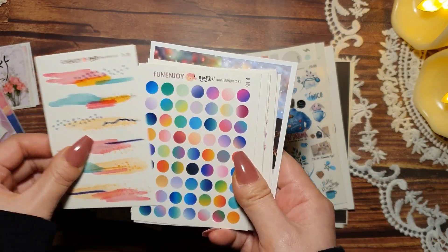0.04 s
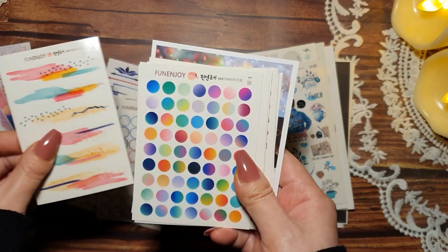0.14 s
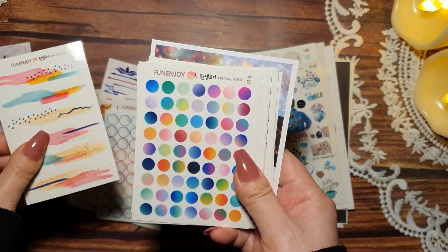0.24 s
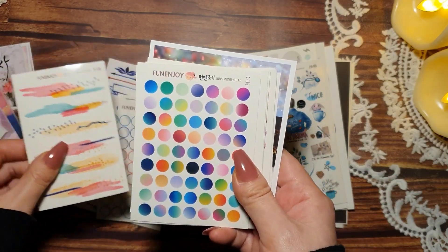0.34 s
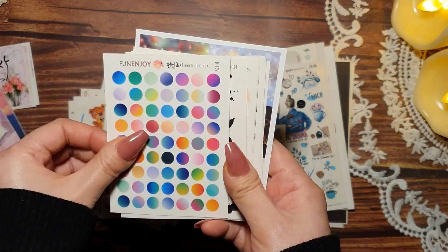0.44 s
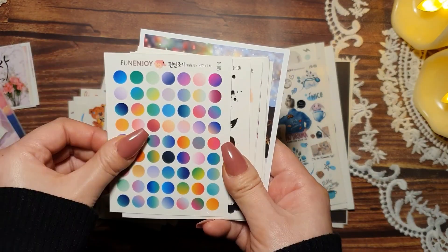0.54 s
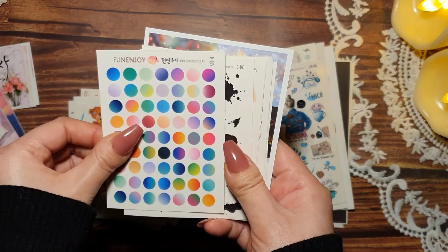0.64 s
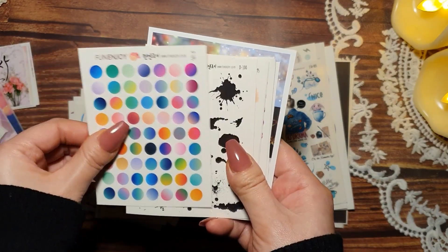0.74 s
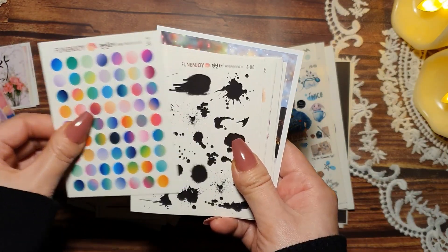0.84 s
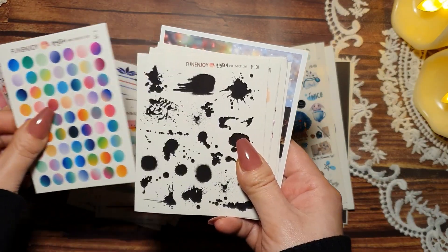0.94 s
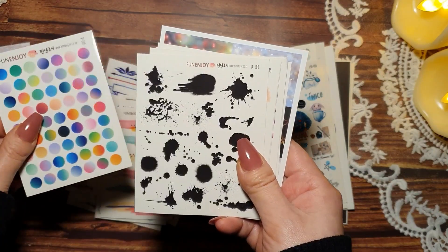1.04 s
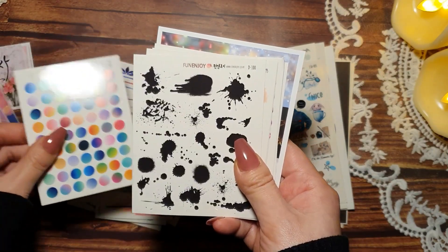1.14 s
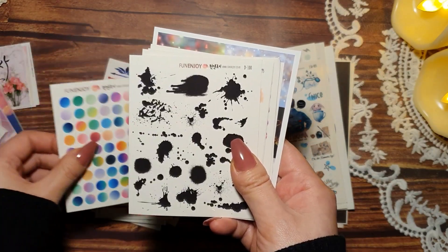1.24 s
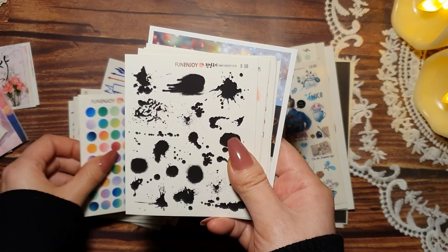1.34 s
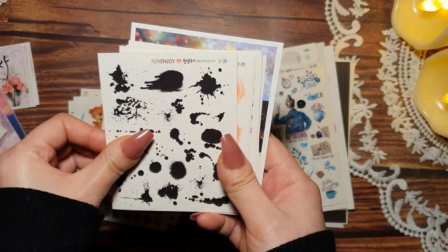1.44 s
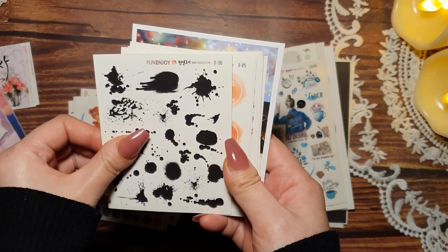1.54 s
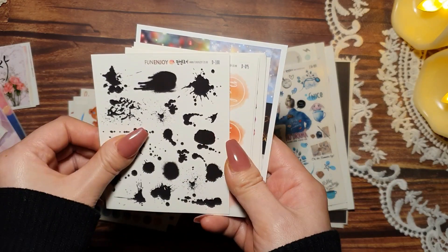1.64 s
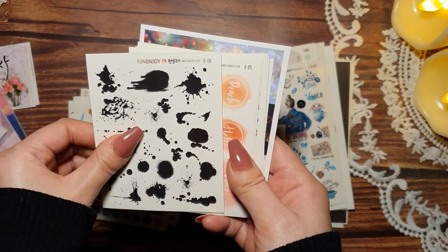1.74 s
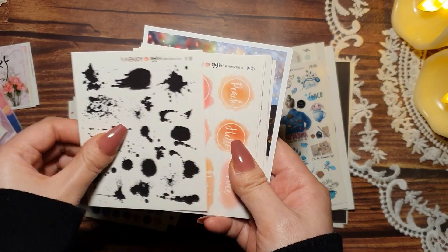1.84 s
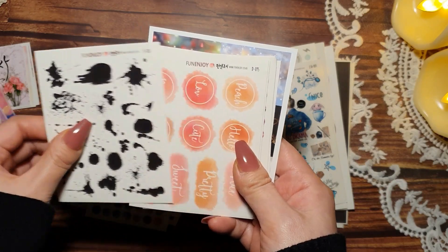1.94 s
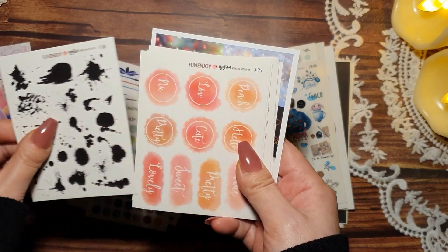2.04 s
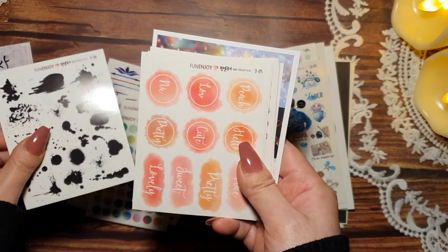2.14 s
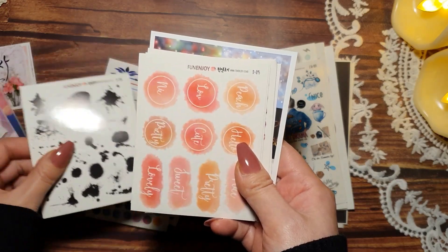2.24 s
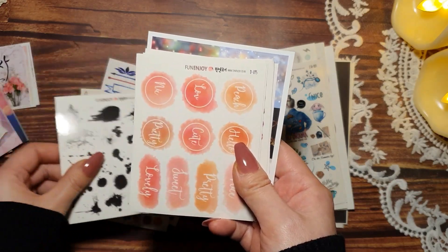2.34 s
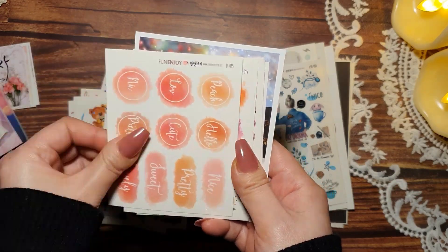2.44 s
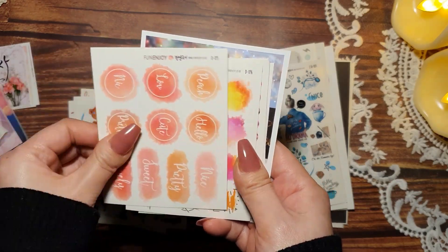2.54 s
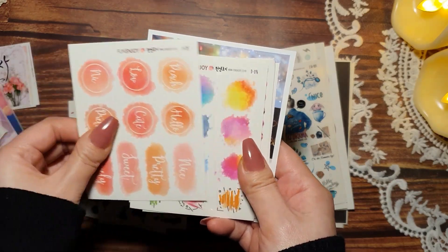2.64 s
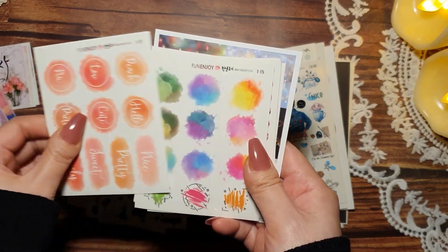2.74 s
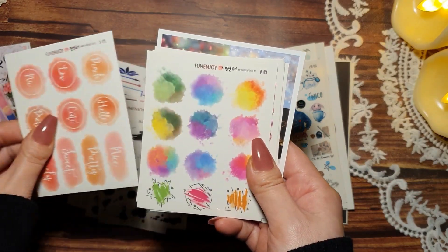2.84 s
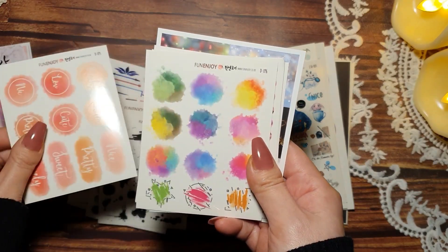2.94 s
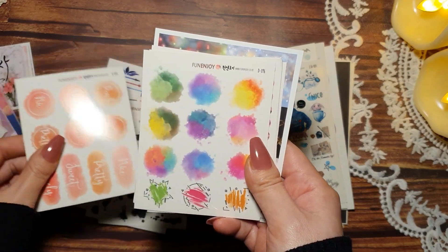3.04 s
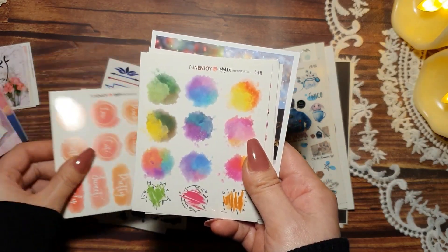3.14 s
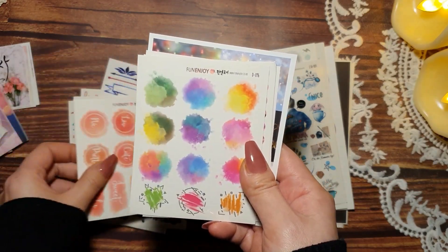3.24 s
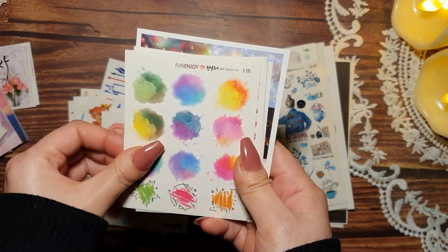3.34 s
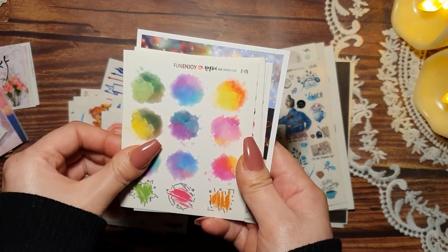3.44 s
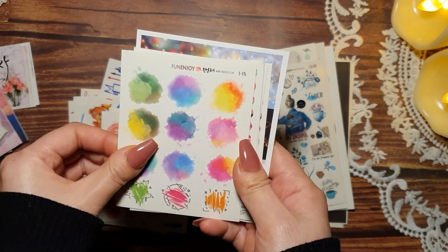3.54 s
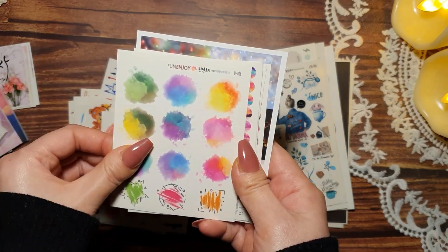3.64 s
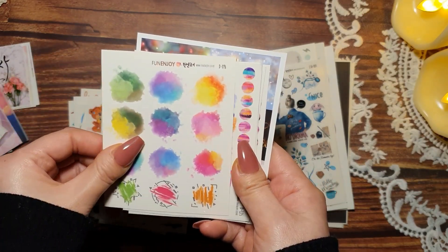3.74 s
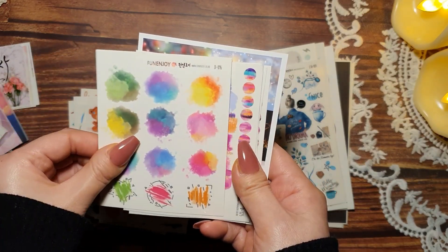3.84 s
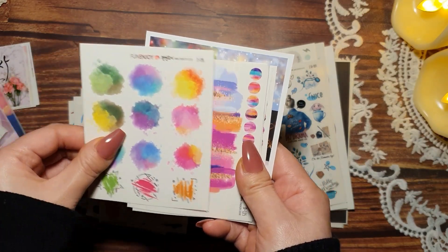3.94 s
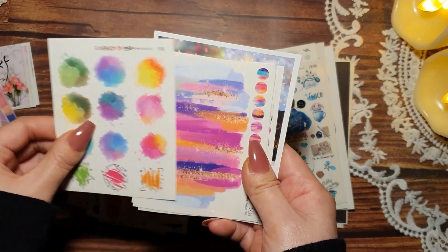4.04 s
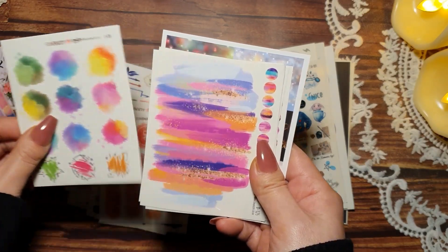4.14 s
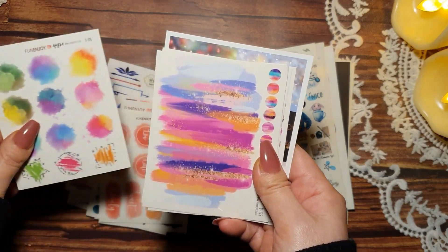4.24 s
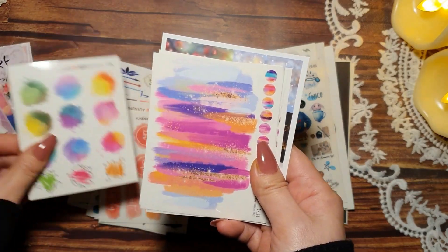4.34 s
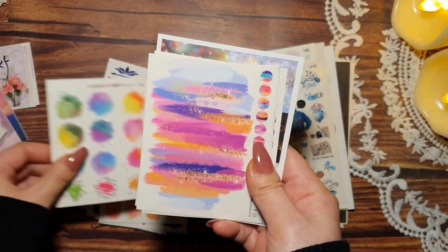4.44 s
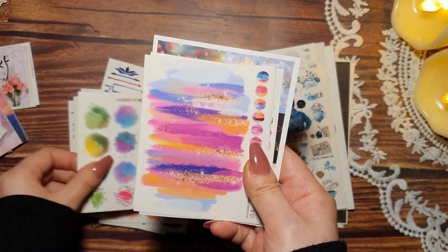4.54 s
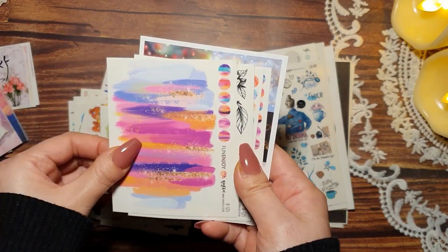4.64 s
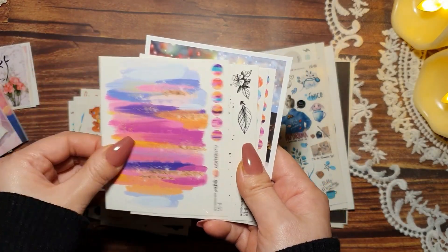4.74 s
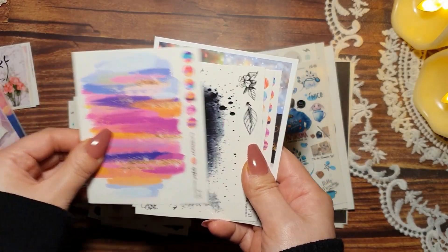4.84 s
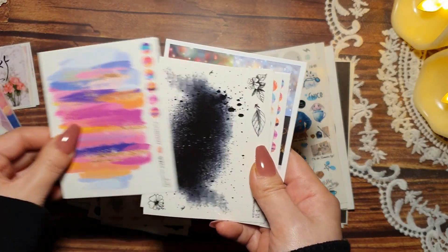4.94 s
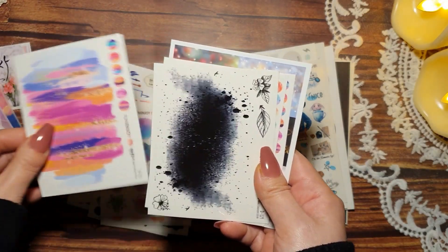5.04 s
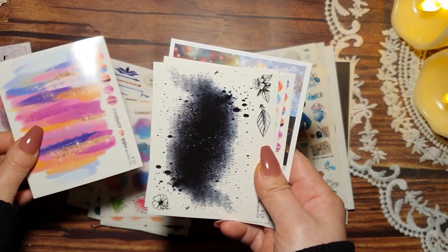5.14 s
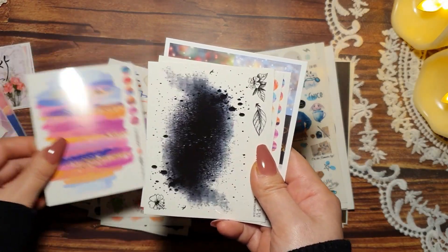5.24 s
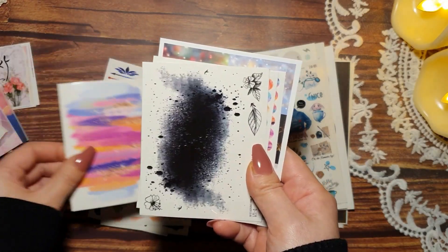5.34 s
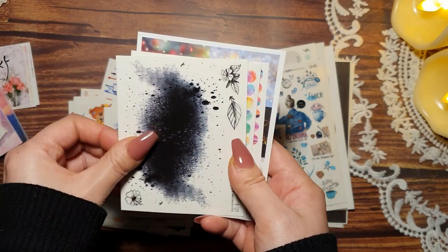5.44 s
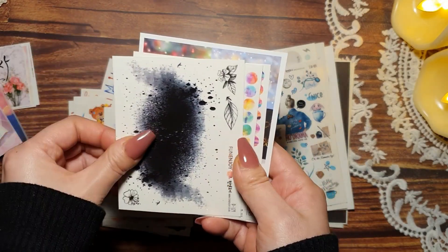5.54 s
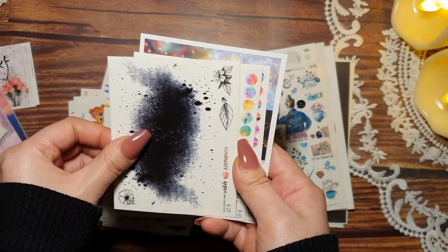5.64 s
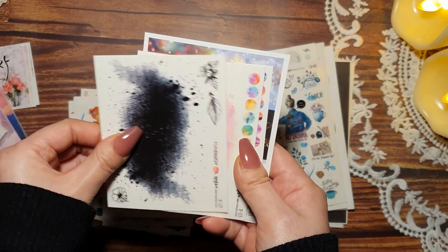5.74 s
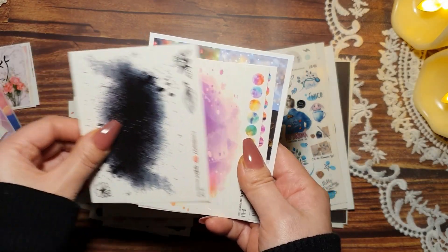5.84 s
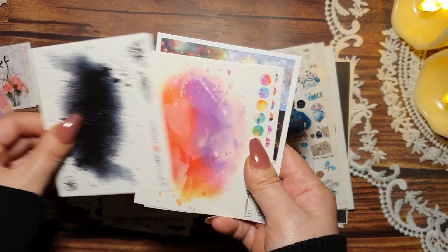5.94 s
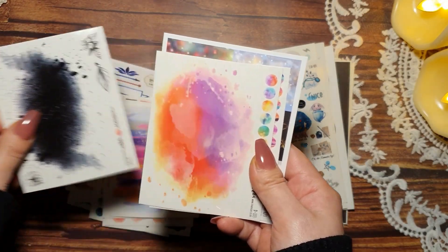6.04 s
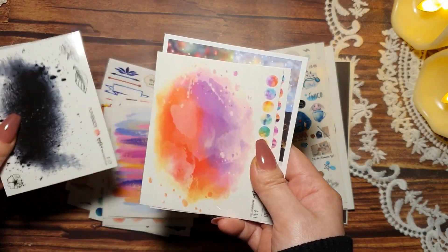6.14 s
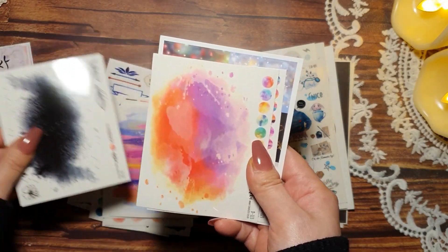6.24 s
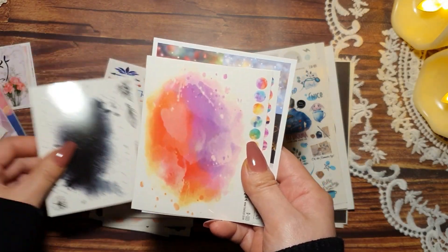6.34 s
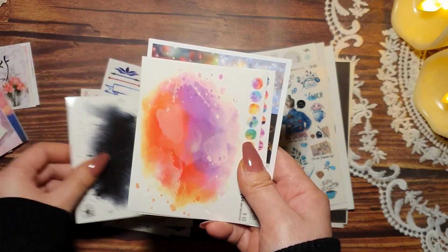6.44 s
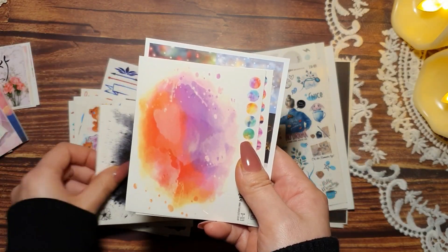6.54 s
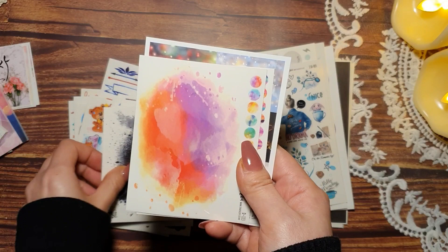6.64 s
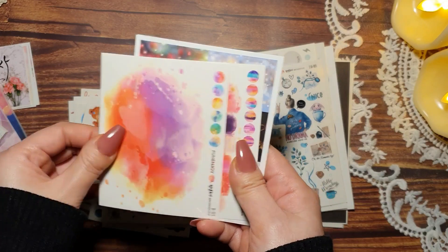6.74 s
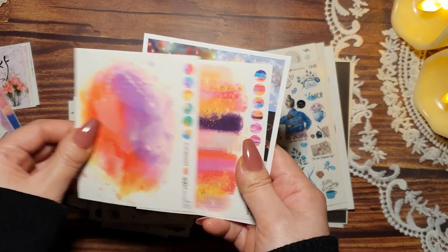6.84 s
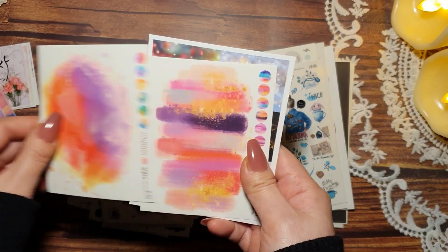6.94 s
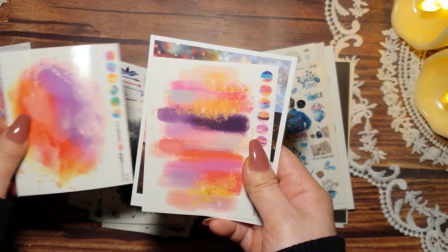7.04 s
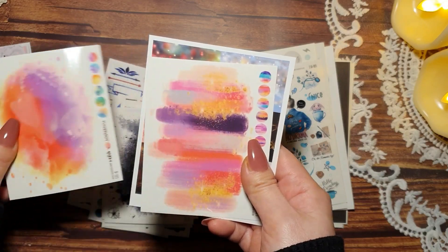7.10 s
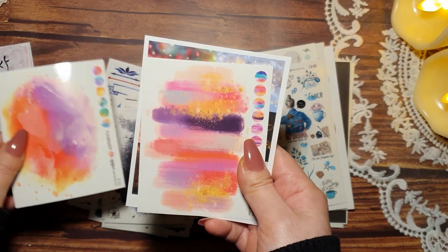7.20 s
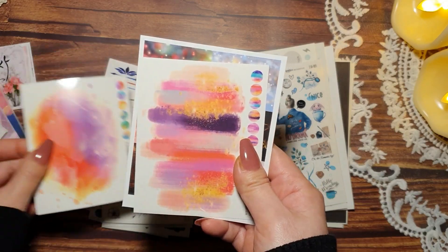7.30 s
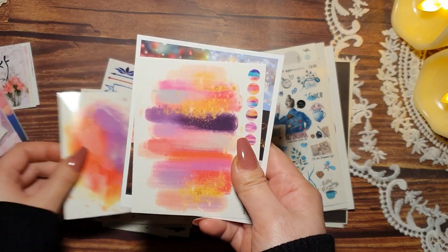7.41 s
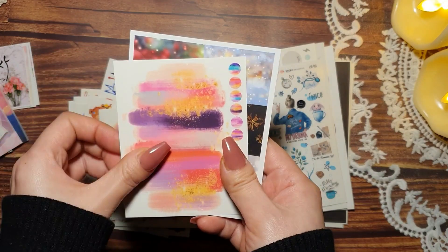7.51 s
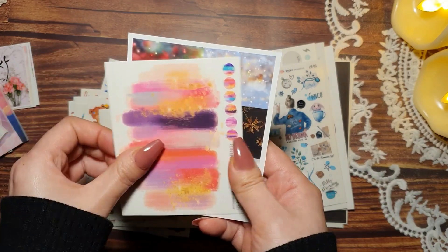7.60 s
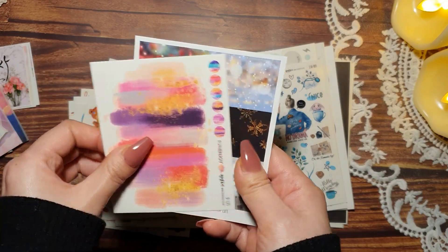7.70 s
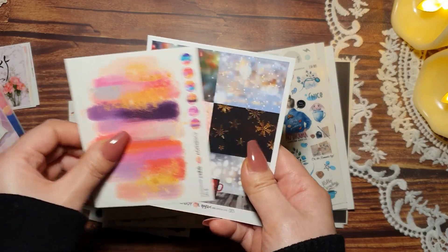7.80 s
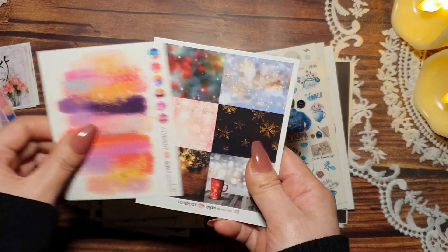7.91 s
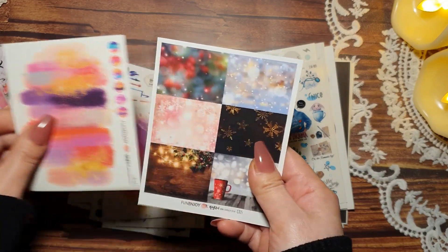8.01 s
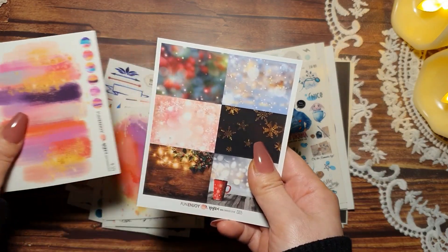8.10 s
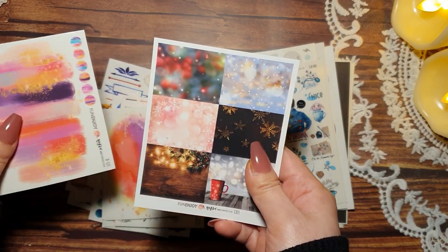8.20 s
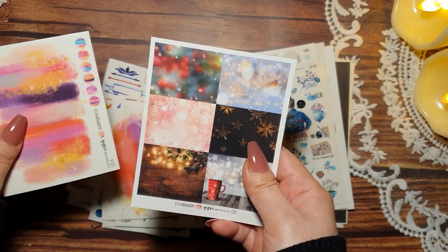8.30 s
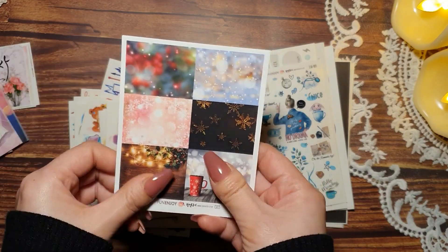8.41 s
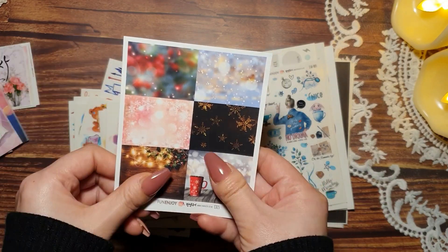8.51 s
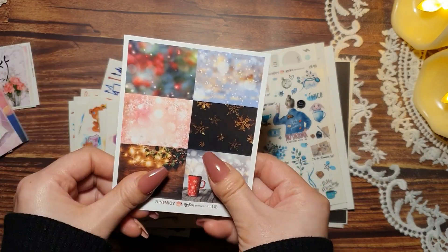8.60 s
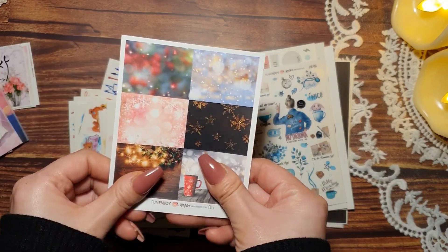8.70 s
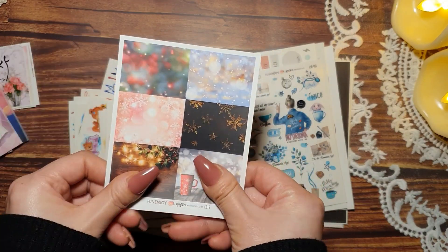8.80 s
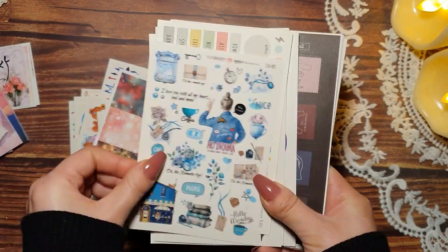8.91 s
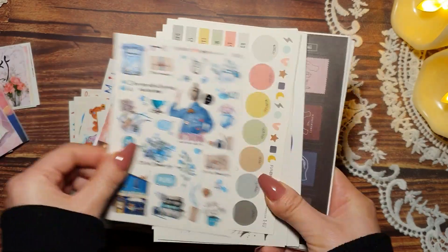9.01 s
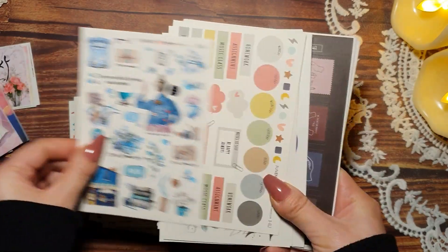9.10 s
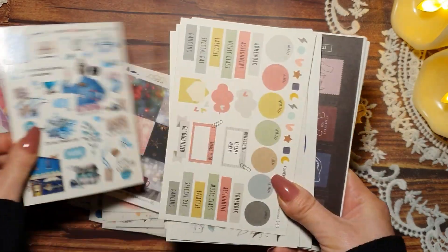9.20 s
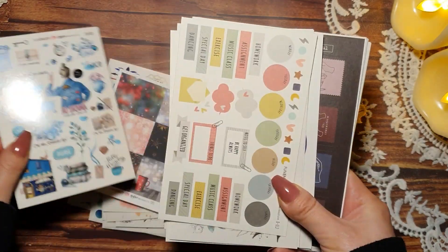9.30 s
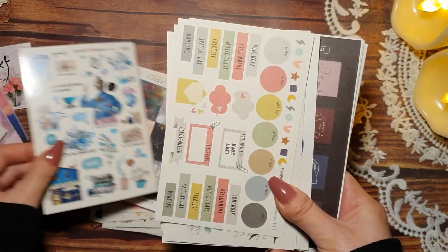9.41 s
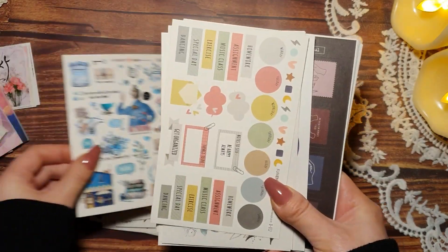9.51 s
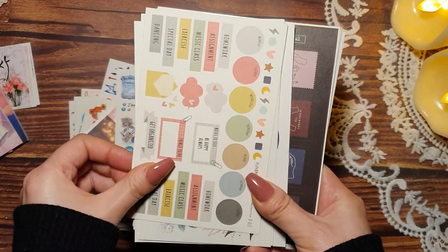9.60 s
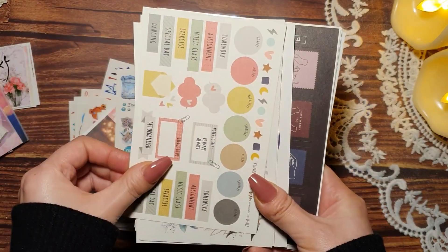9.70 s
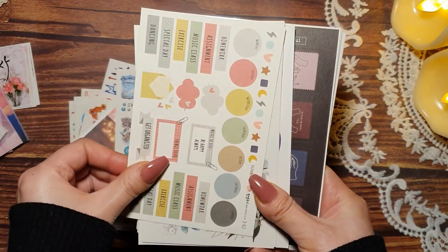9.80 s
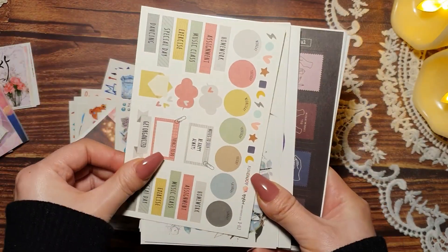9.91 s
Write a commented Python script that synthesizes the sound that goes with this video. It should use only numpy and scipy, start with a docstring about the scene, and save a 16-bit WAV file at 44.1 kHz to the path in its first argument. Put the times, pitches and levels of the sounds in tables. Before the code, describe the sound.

Hands slide glossy sticker sheets off a stack one by one, each hissing and snapping free, in a quiet room.

```python
"""A quiet room, close to a stereo microphone: hands deal glossy sticker sheets off a held stack.
The thumb nudges a sheet, then it is drawn hissing over the next, brightest as its edge runs off.
The edge snaps free, the loose sheet flaps, and a corner often ticks just after.
Fingers and nails touch the stack in between, over a low rumble."""
import sys
import numpy as np
from scipy import signal
from scipy.fft import rfft, irfft
from scipy.io import wavfile
from scipy.ndimage import uniform_filter1d, map_coordinates

SR = 44100
rng = np.random.default_rng(int(sys.argv[2]) if len(sys.argv) > 2 else 0)


def wav_out(sig):
    """Save sig, one row per channel (or a flat mono array), as 16-bit PCM at SR to the path in sys.argv[1]."""
    wavfile.write(sys.argv[1], SR, np.round(np.clip(np.atleast_2d(sig).T, -1, 1) * 32767).astype(np.int16))


N = 439225
T = np.arange(N) / SR

# friction spectra: f/Hz, gain/dB
RUB_SPECTRUM = [(550, -24), (900, -18), (1350, -16.5), (1900, -1), (2300, 2), (2850, -4), (3450, -0.5),
                (4800, -10), (9000, -14.5)]
LARGE_RUB_SPECTRUM = [(560, -20), (900, -1.5), (1550, -8), (2400, 4.5), (3800, 1.5), (9000, -13.5)]
FIZZ_SPECTRUM = [(4000, -32.5), (8000, -12), (10000, 2), (14000, 0.5), (16000, -4)]
COATING_SPECTRUM = [(2500, -28), (5300, -7), (6900, -1.5), (11000, -14), (15000, -47)]
RASP_SPECTRUM = [(1450, -46.5), (1770, -2.5), (2150, -36)]
DRUM_SPECTRUM = [(620, -17), (820, 3.5), (1300, -7.5), (2500, -42.5)]
def sliding_sheets():
    """Card slides on card: rub, fizz, coating hiss, rasp and drumming. The last sheet is a large one."""
    large_from_s, rasp_limit_db = 8.985, -52.5
    faces, coating, edge, rim, loose = pull_envelopes()
    faces, coating = np.hypot([faces, coating], nudge_envelopes())
    rub = np.hypot(faces, rim)
    small, large = rub * (T < large_from_s), rub * (T >= large_from_s)
    fizz = np.hypot(edge, amp(-10) * coating)
    rasp = np.minimum(0.42 * small, amp(rasp_limit_db))
    drum = np.hypot(amp(-16.5) * faces, loose)
    card = friction(RUB_SPECTRUM, grain_db=2.5, patch_db=3)
    card = drift(card, depth_db=0.08, samples=4000)
    hand_judder = waver(depth_db=0.7, samples=500)
    return hand_judder * (
        small * place(card, left_db=-1.5, lag_samples=2)
        + large * friction(LARGE_RUB_SPECTRUM, grain_db=2.5, patch_db=2)
        + fizz * friction(FIZZ_SPECTRUM, grain_db=4, patch_db=3.5) * pan(left_db=-2)
        + coating * friction(COATING_SPECTRUM, grain_db=2, patch_db=3.5) * pan(left_db=0.5)
        + rasp * friction(RASP_SPECTRUM, grain_db=2.5, patch_db=7.5)
        + drum * friction(DRUM_SPECTRUM, grain_db=1, patch_db=2))


# sheet drawn off: t_free/s, speed-up/s, rim drag/s, rub/dB, swell/dB, coating/dB, edge fizz/dB,
# parting/s, rim scrape/dB, drum/dB
PULLS = [ (0.271, .1, 0.042, -50, 19, -53, -52, 0.087, -42, -61),
         (1.108, 0.15, 0.054, -51.5, 39, -48.5, -47, 0.12, -42, -77),
         (2.217, 0.17, 0.058, -49, 37, -46, -43.5, 0.15, -42.5, -58),
         (3.0205, 0.19, 0.08, -58, 9.5, -54.5, -58, 0.22, -46, -57),
         (4.297, 0.35, 0.056, -44, 37, -43, -42.5, 0.015, -41, -51.5),
         (5.197, 0.29, 0.16, -51, 22, -46, -68, 0.066, -46.5, -54),
         (6.171, 0.42, 0.0086, -58.5, 17, -50, -53, 0.14, -52, -68),
         (7.16, 0.23, 0.091, -41, 17, -34.5, -33, 0.019, -42, -52),
         (8.162, 0.35, 0.073, -42.5, 18, -42.5, -37, 0.053, -44.5, -41.5),
         (9.324, 0.17, 0.079, -34, 15.5, -32.5, -36, 0.079, -40, -44)]
def pull_envelopes():
    """A sheet speeds up, runs off and drags over the rim; it drums as the stack damps it less."""
    attack_s, release_s, edge_rise_s, edge_fall_s = 0.061, 0.011, 0.035, 0.0066
    parting_db, rim_swell_db, drum_db_per_s = 21.5, 16, 137
    levels = np.zeros((5, N))
    for free_s, speed_s, drag_s, rub_db, swell_db, coat_db, edge_db, part_s, rim_db, drum_db in PULLS:
        t = np.arange(-speed_s, drag_s + 10 * release_s, 1 / SR)  # 0 = edge runs off
        to_go = np.maximum(-t, 0) / speed_s
        until_free_s = np.maximum(drag_s - t, 0)
        parted = 1 - np.exp(-(np.maximum(t, 0) / part_s) ** 2)
        faces = amp(-swell_db * to_go ** 0.76 - parting_db * parted)
        running_off = np.exp(-(t / np.where(t < 0, edge_rise_s, edge_fall_s)) ** 2)
        edge = amp(edge_db) * np.hypot(running_off, amp(-6) * faces)
        rim = amp(rim_db - rim_swell_db * (until_free_s / drag_s) ** 2)
        drum = amp(drum_db - drum_db_per_s * until_free_s)
        parts = np.array([amp(rub_db) * faces, amp(coat_db) * faces, edge, rim, drum])
        add(levels, free_s - drag_s - speed_s, parts * gate(t, -speed_s, drag_s, attack_s, release_s))
    return levels


# thumb strokes: t/s, length/s, attack/s, rub/dB, coating/dB
NUDGES = [(0, 0.14, 0.0017, -64, -63.5), (0.714, 0.22, 0.088, -65, -60.5), (1.55, 0.12, 0.036, -67.5, -63),
          (1.724, 0.15, 0.13, -69, -62), (1.893, 0.25, 0.13, -65.5, -62), (2.488, 0.27, 0.23, -64.5, -60),
          (3.743, 0.13, 0.1, -72, -60), (6.767, 0.16, .02, -57.5, -58), (7.714, 0.21, 0.008, -52, -56.5),
          (8.604, 0.36, 0.13, -56, -56.5), (8.989, 0.22, 0.013, -54, -57)]
# stroke decay: rub/dB, release/s
NUDGE_RELEASE = [(-65, .05), (-56, .008)]
def nudge_envelopes():
    """The thumb slides a sheet at an even pace: light strokes fade, firm ones stop dead."""
    levels = np.zeros((2, N))
    for s, length_s, attack_s, rub_db, coat_db in NUDGES:
        release_s = np.interp(rub_db, *np.transpose(NUDGE_RELEASE))
        t = np.arange(0, length_s + 10 * release_s, 1 / SR)
        add(levels, s, amp([[rub_db], [coat_db]]) * gate(t, 0, length_s, attack_s, release_s))
    return levels


def friction(spectrum, grain_db, patch_db):
    """Tiny uneven slips ring through the card; the colour drifts in patches of time and frequency."""
    slips = rng.standard_normal((2, N)) * amp(grain_db * np.minimum(rng.exponential(1, N), 5))
    noise = colour(pair(slips), spectrum)
    bands = signal.stft(noise, nperseg=512, noverlap=384)[2]
    patches = uniform_filter1d(rng.standard_normal(bands.shape[1:]), 4, axis=0)
    patches = unit(uniform_filter1d(patches, 22, axis=1))
    return unit(signal.istft(bands * amp(patch_db * patches), nperseg=512, noverlap=384)[1][:, :N])


def drift(x, depth_db, samples):
    """The card's resonances wander as grip and overhang change."""
    position = np.cumsum(waver(depth_db, samples))
    return np.array([map_coordinates(channel, [position], order=3, mode="mirror") for channel in x])


# resonance tracks: t/s, level/dB, f/Hz
STACK_PUSH = [(8.68, -58, 2050), (8.86, -57.5, 2250), (8.98, -49, 3020)]
EDGE_WHISTLE = [(6.86, -64, 10300), (6.99, -44, 10100), (7.08, -53, 11900)]
RIM_CATCH = [(7.112, -45, 2250), (7.165, -46, 2090)]
def rasps():
    """Friction in one gliding resonance: the stack is pushed, an edge whistles, then catches the rim."""
    out = np.zeros((2, N))
    for track, half_width_hz in (STACK_PUSH, 460), (EDGE_WHISTLE, 800), (RIM_CATCH, 400):
        s, db, hz = np.transpose(track)
        t = np.arange(s[0], s[-1], 1 / SR)
        carrier = np.exp(2j * np.pi * np.cumsum(np.interp(t, s, hz)) / SR)
        slips = pair(rng.standard_normal((2, len(t))))
        baseband = signal.lfilter(*signal.butter(2, half_width_hz, fs=SR), slips / carrier)
        envelope = amp(np.interp(t, s, db)) * signal.windows.tukey(len(t), 0.06)
        add(out, s[0], unit((carrier * baseband).real) * envelope)
    return out


# edge comes free (the 6.759 s row is a sharp touch on the stack mid-pull, played alike): t/s, level/dB, main
# ring f/Hz, tilt/(dB/oct)
SNAPS = [(0.2712, -19, 2260, 0.5), (1.109, -26, 1810, 3.5), (2.218, -20, 1760, 1.5),
         (3.0202, -24, 2550, -1), (4.2977, -17.5, 2600, 1), (5.195, -26, 2440, 0.5),
         (6.1708, -36, 2460, 7.5), (6.759, -42.5, 2440, 1), (8.166, -35, 1780, -6.5),
         (9.3257, -29.5, 2460, -3.5)]
# card modes and chatter spectrum: f/Hz, gain/dB
CARD_MODES = [(1740, -2), (2050, -11), (2440, 0), (3620, 5.5)]
SNAP_SPECTRUM = [(200, -10.5), (950, -1), (1450, -17.5), (1800, 4.5), (2500, 5), (2950, -5.5), (3500, -9),
                 (4800, -15.5), (7000, -16.5), (15000, -33.5)]
def edge_snaps():
    """The bent edge cracks off the stack and chatters; the card rings, most near its main ring. A sharp touch
    mid-pull sounds the same way."""
    t60_s, boost_db, boost_width_hz = 0.026, 9.5, 250
    out, t = np.zeros((2, N)), T[:6000]
    for s, db, main_hz, tilt_db in SNAPS:
        chatter = burst(length_s=0.0051, tail_db=-45, t60_s=0.055)
        chatter[:, SR // 2000] += 7.5  # the crack
        ring = np.zeros(len(t))
        for hz, mode_db in CARD_MODES:
            mode_db += boost_db * np.exp(-((hz - main_hz) / boost_width_hz) ** 2)
            ring += amp(mode_db - 60 * t / t60_s) * np.sin(2 * np.pi * hz * t)
        snap = unit(colour(chatter, SNAP_SPECTRUM, tilt_db)) + unit(ring)
        add(out, s, with_energy(snap, db, held_s=0.0025))
    return place(out, left_db=-0.5)


# sheet flexes: t/s, level/dB, main ring f/Hz, length/s
FLAPS = [(0.274, -26.5, 760, 0.011), (0.284, -35.5, 333, 0.018), (1.11, -41.5, 865, 0.013),
         (1.578, -57, 400, 0.065), (2.032, -51.5, 824, 0.0052), (2.2167, -25, 1060, 0.0065),
         (2.228, -25, 584, 0.0066), (3.024, -26, 564, 0.016), (4.303, -31.5, 496, 0.021),
         (5.198, -37, 473, 0.013), (5.214, -36, 824, 0.012), (6.174, -38.5, 400, 0.032),
         (7.147, -38.5, 790, 0.036), (8.165, -35.5, 726, 0.014), (8.51, -46, 750, 0.0031),
         (8.7, -50, 880, 0.013), (9.334, -52.5, 226, 0.039)]
# f/Hz, gain/dB
FLAP_SPECTRUM = [(270, -3), (410, 1), (560, -7), (830, 1), (1100, -5.5), (1450, -21.5), (2400, -16),
                 (3000, -27.5), (14000, -48.5)]
def flaps():
    """Let go or pressed, the whole sheet wobbles in its low bending modes."""
    out = np.zeros((2, N))
    for s, db, hz, length_s in FLAPS:
        wobble = burst(length_s, tail_db=-4.5, t60_s=0.1)
        wobble = signal.lfilter(*signal.butter(2, 0.42 * hz, "high", fs=SR), wobble)
        wobble = colour(wobble, FLAP_SPECTRUM, ring_hz=hz, ring_db=8.5, ring_width=0.28)
        add(out, s, with_energy(wobble, db, length_s))
    return place(out, left_db=1.6)


# corner strikes: t/s, level/dB
CORNERS = [(0.289, -28.5), (1.1315, -28), (2.238, -24), (3.0417, -23.5), (5.2195, -27), (6.199, -36.5),
           (7.1639, -32), (7.1832, -24.5), (9.3614, -30)]
# f/Hz, gain/dB
TICK_SPECTRUM = [(100, 1.5), (900, 4.5), (1400, -5), (2400, -2.5), (15000, -29)]
def corner_ticks():
    """A corner of the freed sheet hits the stack: one sharp contact, a short ring."""
    out = np.zeros((2, N))
    for s, db in CORNERS:
        tick = burst(length_s=0.00074, tail_db=2, t60_s=0.048)
        tick[:, 0] += 9
        add(out, s, with_energy(colour(tick, TICK_SPECTRUM), db, held_s=0.0014))
    return place(out, left_db=4)


# nail contacts: t/s, level/dB, tilt/(dB/oct), length/s
NAILS = [(0.528, -47, 9, .004), (1.4395, -45.5, 0, 0.0042), (1.587, -41.5, 6, 0.0029),
         (4.699, -44.5, 5.5, 0.0017), (6.785, -31, 7.5, 0.012), (7.621, -43.5, 2.5, 0.0022),
         (8.2896, -37.5, 2.5, 0.0032), (8.511, -41, 1.5, 0.001), (8.643, -45, 3.5, 0.0017),
         (8.678, -37.5, 0, 0.007), (8.706, -41, 1, 0.0083), (9.591, -44.5, 3, 0.0009),
         (9.656, -49.5, 5, 0.014)]
def nail_clicks():
    """A nail catches the card: a click and a brief scrape."""
    out = np.zeros((2, N))
    for s, db, tilt_db, length_s in NAILS:
        scrape = burst(length_s, tail_db=-10.5, t60_s=0.27)
        scrape[:, 0] += 4
        add(out, s, with_energy(colour(scrape, TICK_SPECTRUM, tilt_db), db, held_s=0.0008))
    return out


# fingertip landings: t/s, level/dB
TAPS = [(3.386, -48), (6.696, -44.5)]
# f/Hz, gain/dB
TAP_SPECTRUM = [(500, -30), (1100, -4.5), (2200, -2), (3000, -16), (12000, -29.5)]
def finger_taps():
    """A fingertip lands on the stack, which rings hollow."""
    out = np.zeros((2, N))
    for s, db in TAPS:
        tap = burst(length_s=0.0022, tail_db=7, t60_s=0.12)
        add(out, s, with_energy(colour(tap, TAP_SPECTRUM), db, held_s=0.0052))
    return out


def squeak(s=4.197, db=-40, hz=1780, length_s=0.028):
    """The coating sticks and slips in one brief tone."""
    out, t = np.zeros((2, N)), T[:round(length_s * SR)]
    add(out, s, amp([[db], [db]]) * np.hanning(len(t)) * np.sin(2 * np.pi * hz * t))
    return out


# skin strokes: t/s, level/dB, length/s
BRUSHES = [(1.747, -66.5, 0.22), (5.304, -55.5, 0.15), (8.001, -53, 0.34), (8.97, -62.5, 0.2)]
def skin_brushes():
    """Fingers and palm brush the card in dull swells of noise."""
    spectrum = [(220, -19), (380, 7), (620, -11.5), (3000, -31)]  # f/Hz, gain/dB
    out = np.zeros((2, N))
    for s, db, length_s in BRUSHES:
        stroke = np.hanning(round(length_s * SR))
        skin = pair(rng.standard_normal((2, len(stroke))))
        add(out, s, amp(db) * stroke * unit(colour(skin, spectrum)))
    return out


# knocks on the stack: t/s, level/dB, length/s
BUMPS = [(4.005, -43.5, .02), (5.665, -51.5, 0.0037)]
# f/Hz, gain/dB
BUMP_SPECTRUM = [(160, -3), (750, -10.5), (1300, -37)]
def finger_bumps():
    """A finger bumps the held stack with a dull thud."""
    out = np.zeros((2, N))
    for s, db, length_s in BUMPS:
        thud = burst(length_s, tail_db=-22, t60_s=0.12)
        add(out, s, with_energy(colour(thud, BUMP_SPECTRUM), db, length_s))
    return out


# air pulses: t/s, relative level/dB
PUFFS = [(1.111, -33.5), (4.3, -40), (6.173, -45), (9.334, -39)]
def air_puffs(hz=85, rise_s=0.0026, decay_s=0.015):
    """A swinging sheet pushes a soft, low pulse of air."""
    out, t = np.zeros((2, N)), T[:SR // 8]
    puff = 2 * np.sin(2 * np.pi * hz * t) * (1 - np.exp(-t / rise_s)) * np.exp(-t / decay_s)
    for s, db in PUFFS:
        add(out, s, amp([[db], [db]]) * puff)
    return out


# room decay: f/Hz, T60/s
ROOM_T60 = [(400, 0.28), (1500, 0.18), (12000, 0.23)]
# room field: f/Hz, left-right correlation
ROOM_COHERENCE = [(60, 0.92), (800, 0.045)]
def room(x, wet_db, echoes_per_s=3000, predelay_s=0.006):
    """A small furnished room: sparse reflections, each band dying at its own rate."""
    size = SR // 2
    echoes = rng.choice([-1., 1.], (2, size)) * (rng.random((2, size)) < echoes_per_s / SR)
    echoes = pair(echoes, ROOM_COHERENCE) * (T[:size] > predelay_s)
    hz, t, bands = signal.stft(echoes, SR, nperseg=256)
    tail = signal.istft(bands * amp(-60 * t / lookup(ROOM_T60, hz)[:, None]), SR)[1]
    tail /= np.linalg.norm(tail[0])
    return x + amp(wet_db) * signal.fftconvolve(x, tail, axes=1)[:, :N]


# rumble contour: t/s, relative level/dB
RUMBLE_CONTOUR = [(0, -61), (1.2, -58), (1.42, -54.5), (1.6, -63), (8.35, -58.5), (8.65, -52), (9.1, -58)]
# f/Hz, gain/dB
RUMBLE_SPECTRUM = [(33, -28.5), (50, 4), (64, -4.5), (160, -17), (600, -62.5)]
HISS_SPECTRUM = [(380, 0.5), (520, -3.5), (1400, -9.5), (3000, -8.5), (4500, -14), (5700, -13),
                 (6400, -2.5), (7100, -12), (8400, -10.5), (9300, -17.5)]
def noise_floor():
    """An uneven low rumble and the steady hiss of room and microphone."""
    rumble = unit(colour(pair(rng.standard_normal((2, N)), ROOM_COHERENCE), RUMBLE_SPECTRUM))
    hiss = unit(colour(pair(rng.standard_normal((2, N)), ROOM_COHERENCE), HISS_SPECTRUM))
    swell = amp(5 + np.interp(T, *np.transpose(RUMBLE_CONTOUR))) * waver(depth_db=1.5, samples=5000)
    return swell * rumble * pan(left_db=2) + amp(-64) * hiss


# close sheet: f/Hz, left-right correlation
SHEET_COHERENCE = [(500, 0.97), (1000, 0.92), (2200, 0.51), (5000, 0.1)]
def pair(x, coherence=SHEET_COHERENCE):
    """Correlates two independent signals, band by band, into a stereo pair."""
    shared = np.clip(lookup(coherence, np.fft.rfftfreq(x.shape[1], 1 / SR)), -1, 1)
    left, other = rfft(x)
    right = shared * left + np.sqrt(1 - shared ** 2) * other
    return irfft(np.array([left, right]), x.shape[1])


def burst(length_s, tail_db, t60_s):
    """Short stereo chatter of paper with a decaying tail."""
    t = T[:6000]
    envelope = np.exp(-(t / length_s) ** 4) + amp(tail_db - 60 * t / t60_s)
    return pair(rng.standard_normal((2, len(t)))) * envelope


def colour(x, spectrum, tilt_db=0, ring_hz=1000, ring_db=0, ring_width=0.1, size=4096):
    """Minimum-phase filter: a spectrum, tilted per octave, with one raised resonance."""
    hz = abs(np.fft.fftfreq(size, 1 / SR))
    db = lookup(spectrum, hz) + tilt_db * np.log2(np.maximum(hz, 500) / 2000)
    db += ring_db / (1 + ((hz / ring_hz - 1) / ring_width) ** 2)
    response = np.exp(np.conj(signal.hilbert(np.log(amp(db)))))
    taps = np.fft.ifft(response).real[:size // 2]
    return signal.oaconvolve(x, taps[None], axes=1)[:, :x.shape[1]]


def gate(t, start_s, end_s, attack_s, release_s):
    """Eases in, holds, decays."""
    rise = np.sin(np.pi / 2 * np.clip((t - start_s) / attack_s, 0, 1)) ** 2
    return rise * np.exp(-np.maximum(t - end_s, 0) / release_s)


def waver(depth_db, samples):
    """Random gain, smoothed over samples."""
    return amp(depth_db * unit(uniform_filter1d(rng.standard_normal(N), samples)))


def with_energy(x, db, held_s):
    """Scales to the energy of level db held for held_s."""
    return amp(db) * x * np.sqrt(held_s * SR / np.mean(np.sum(x ** 2, 1)))


def place(x, left_db, lag_samples=4):
    """Pans and delays the right channel."""
    return np.array([x[0], np.roll(x[1], lag_samples)]) * pan(left_db)


def pan(left_db):
    """Channel gains for a left-minus-right level."""
    return amp([[left_db / 2], [-left_db / 2]])


def add(mix, s, sound):
    """Mixes a sound in at time s."""
    part = mix[:, max(round(s * SR), 0):][:, :sound.shape[1]]
    part += sound[:, :part.shape[1]]


def lookup(points, hz):
    """Interpolates on a log-frequency axis."""
    f, value = np.transpose(points)
    return np.interp(np.log(hz + 1), np.log(f + 1), value)


def amp(db):
    """dB to gain."""
    return 10 ** (np.asarray(db) / 20)


def unit(x):
    """Scales to rms 1."""
    return x / np.sqrt(np.mean(x ** 2) + 1e-20)


def scene():
    """Sheets and hands in the room, over its noise floor."""
    sheets = sliding_sheets() + rasps() + edge_snaps() + flaps() + corner_ticks()
    hands = nail_clicks() + finger_taps() + squeak() + skin_brushes() + finger_bumps()
    return room(sheets + hands + air_puffs(), wet_db=-14) + noise_floor()


def record(dry, cutoff_hz=15900):
    """The recorder's band limit."""
    lowpass = signal.firwin(511, cutoff_hz, window=("kaiser", 9), fs=SR)
    return signal.oaconvolve(dry, lowpass[None], "same")


dry = scene()
out = record(dry)
wav_out(out)
```